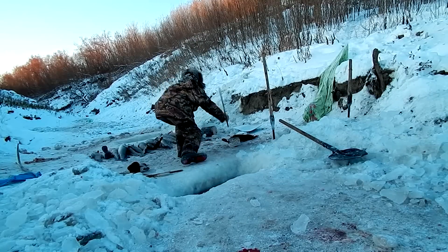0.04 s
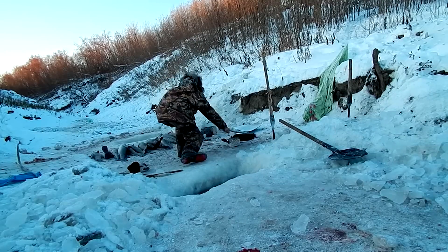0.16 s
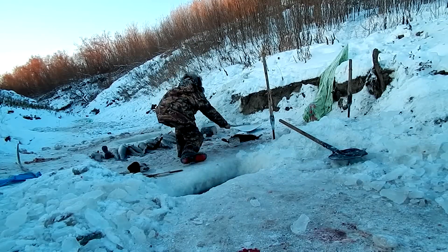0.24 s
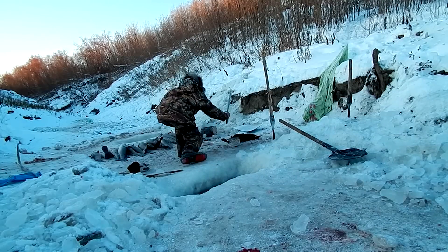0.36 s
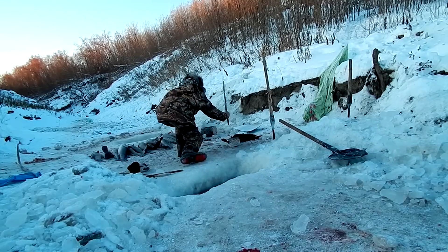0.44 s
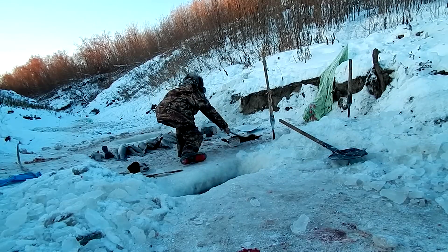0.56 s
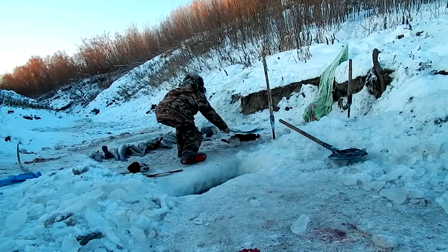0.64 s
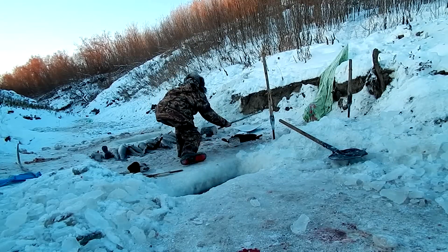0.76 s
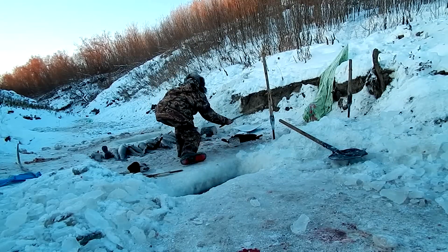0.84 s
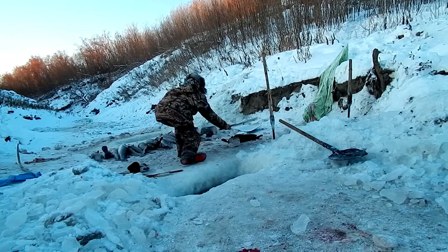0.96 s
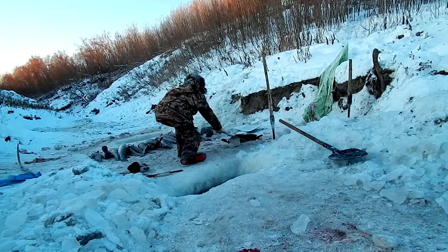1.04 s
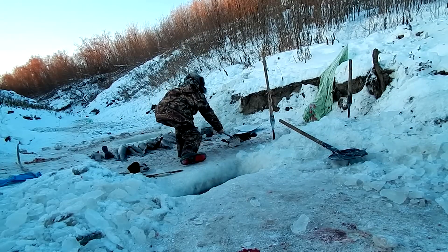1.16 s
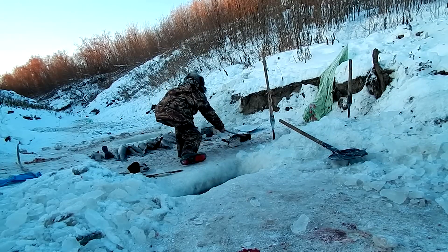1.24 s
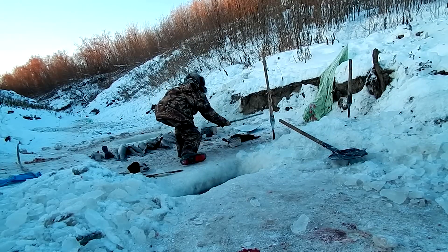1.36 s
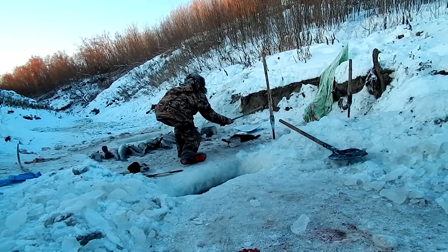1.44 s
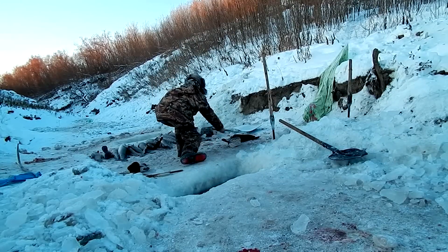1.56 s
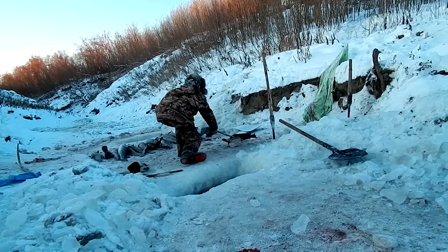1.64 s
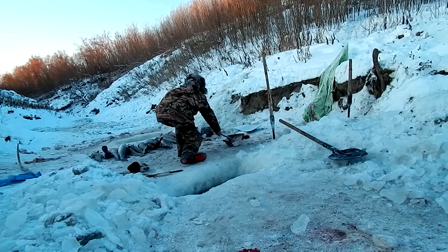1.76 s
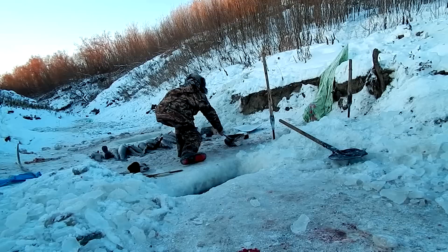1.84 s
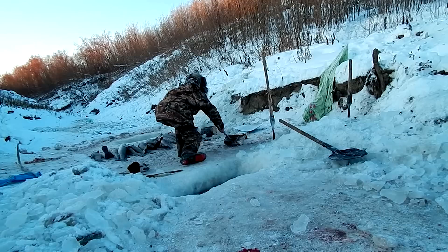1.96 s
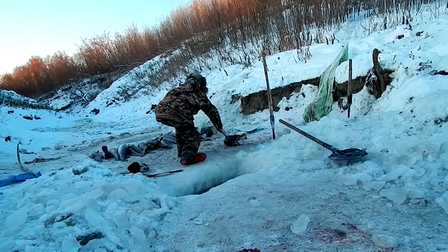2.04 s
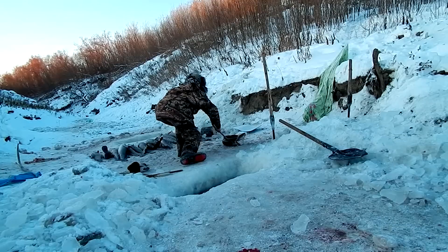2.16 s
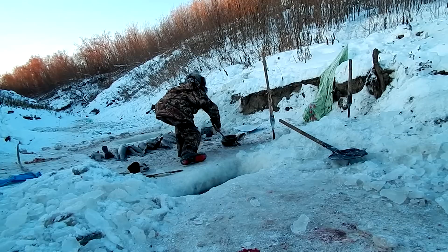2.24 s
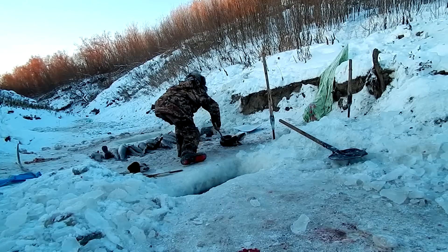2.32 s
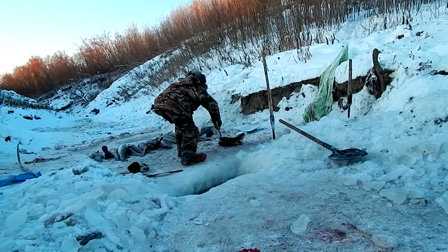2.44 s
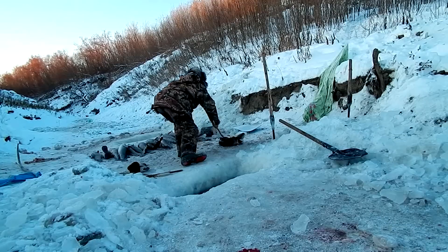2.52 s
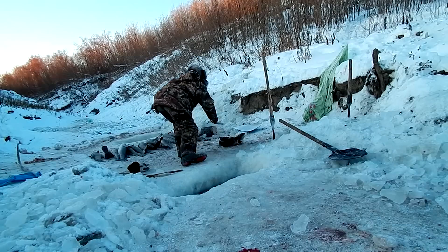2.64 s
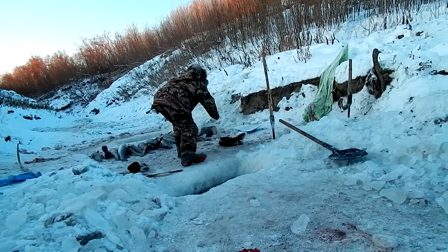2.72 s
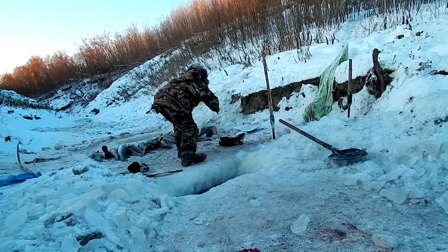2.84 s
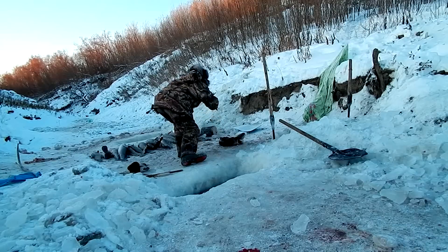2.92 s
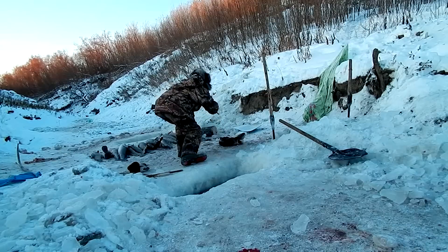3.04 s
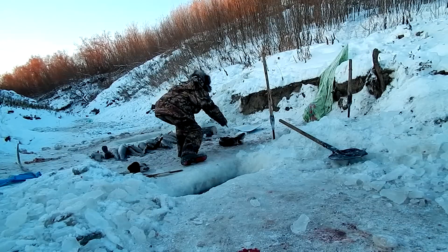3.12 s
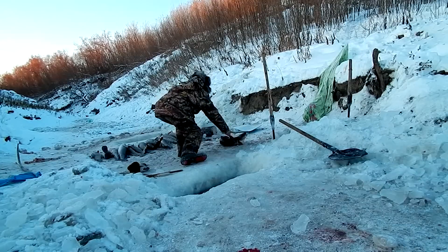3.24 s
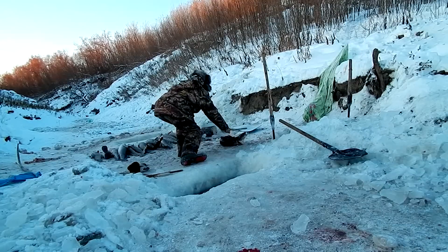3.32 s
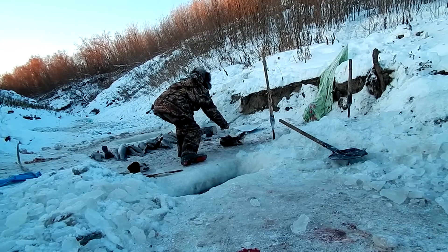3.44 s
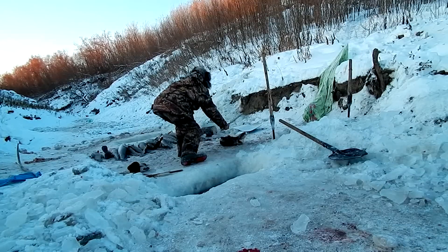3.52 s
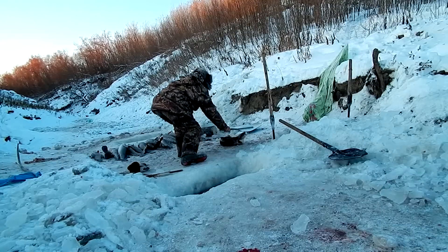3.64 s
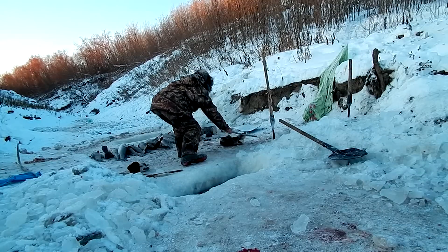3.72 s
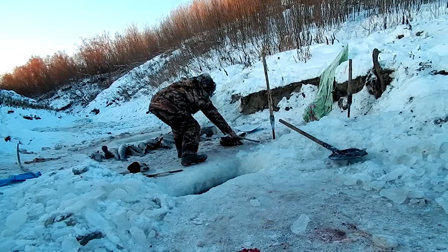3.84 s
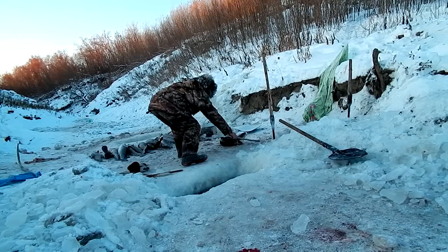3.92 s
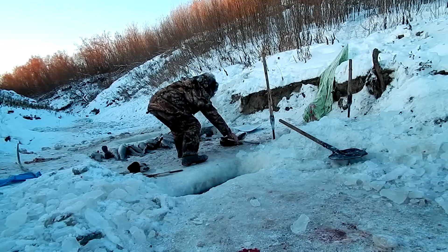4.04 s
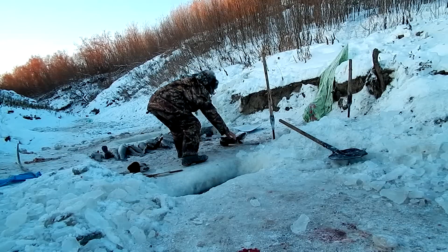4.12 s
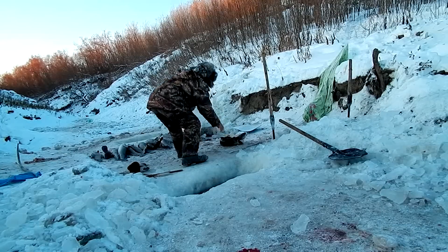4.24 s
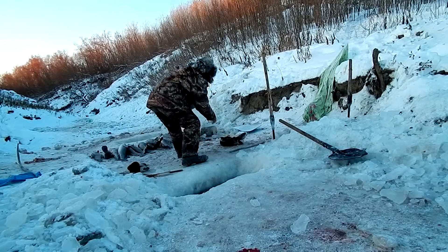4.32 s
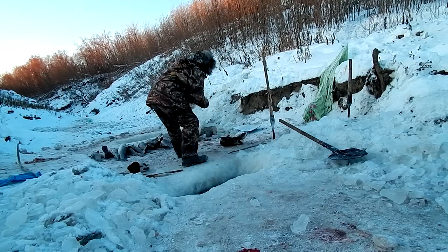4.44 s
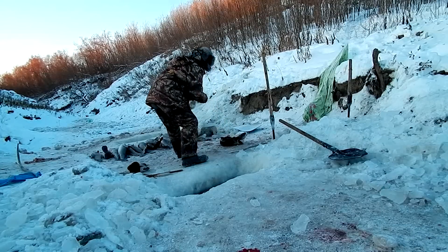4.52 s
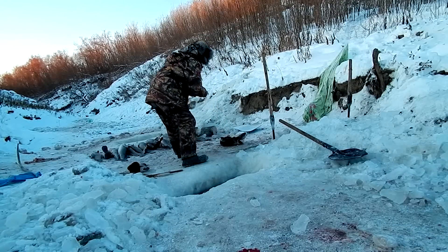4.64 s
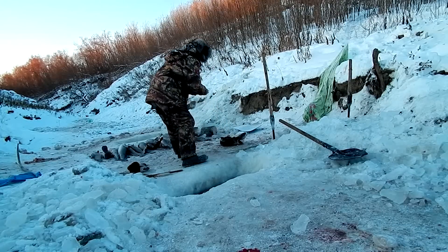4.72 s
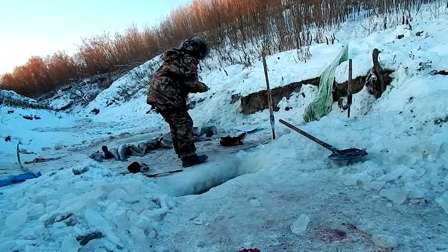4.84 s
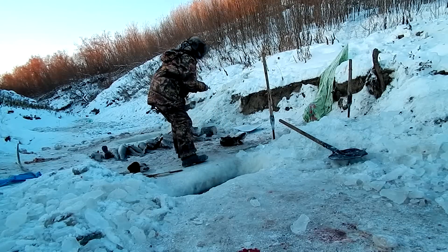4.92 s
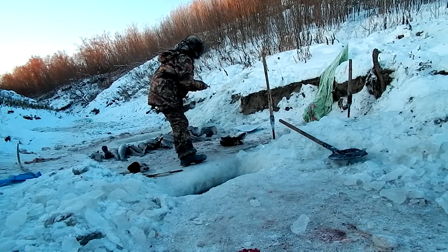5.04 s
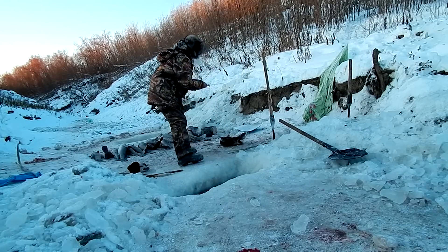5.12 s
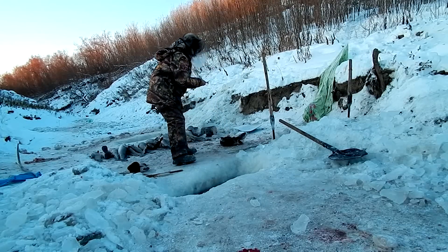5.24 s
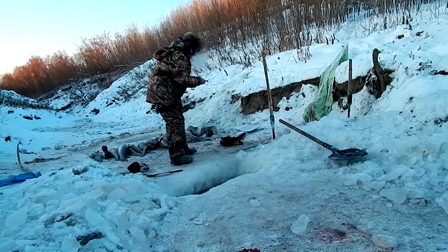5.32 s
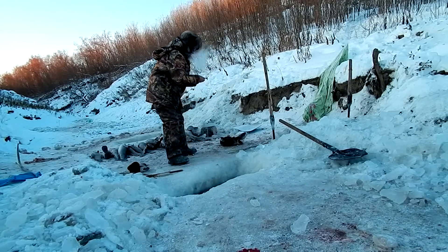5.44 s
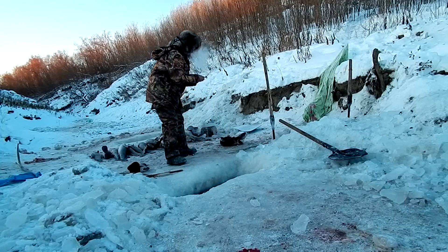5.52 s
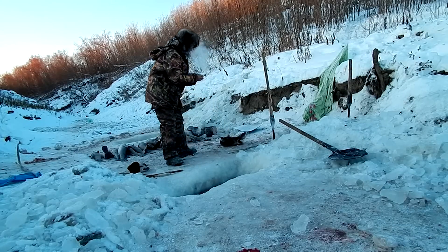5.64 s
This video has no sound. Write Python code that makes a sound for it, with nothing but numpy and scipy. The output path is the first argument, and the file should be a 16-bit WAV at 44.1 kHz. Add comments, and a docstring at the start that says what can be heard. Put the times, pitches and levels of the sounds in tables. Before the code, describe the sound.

A steel chisel chops into river ice with spaced, sharp, cracking blows, then drags and rattles over loose chips as boots and stiff cloth rustle.

```python
"""On river ice outdoors, a steel chisel is driven in five times, then dragged and rattled over the chips.
Each blow is a burst of cracking noise, a ring that sags in pitch, damped modes of the sheet and a spray of grains.
Knocks convolve noise with the modes of the bar; snaps are short filtered noise; soft thumps ring the sheet.
Boots and stiff cloth crunch, creak and rustle as noise that swells and dies over a faint hush."""
import sys
import numpy as np
from scipy import signal
from scipy.fft import rfft, irfft
from scipy.io import wavfile
from scipy.ndimage import uniform_filter1d

SR = 44100
rng = np.random.default_rng(int(sys.argv[2]) if len(sys.argv) > 2 else 0)


def file_out(sig):
    """Save sig as 16-bit WAV at sys.argv[1]."""
    # one column per channel
    cols = np.atleast_2d(sig).T
    # limit, then scale
    lim = np.clip(cols, -1, 1)
    pcm = np.round(lim * 32767).astype(np.int16)
    wavfile.write(sys.argv[1], SR, pcm)


N = 250488
T = np.arange(N) / SR
OPPOSED = np.array([[1], [-1]])  # signs of a left-right difference

# Five chisel blows, their rebounds and a few hard bumps on the ice. Each row: start in seconds, ring peak in dB,
# settled ring pitch in Hz, ring t60 in seconds, time constant of the pitch sag in seconds, thud and crack peaks
# in dB against the ring, crack centre in Hz, gain of its sizzle in dB, spray gain in dB (12 dB is taken off
# later), left minus right in dB.
BLOW_EVENTS = [(0.068, -11, 430, 0.022, 0.0013, -10.5, -1.5, 1940, -17, -21, -1.5),
               (0.540, -17, 273, 0.033, 0.0032, -0.5, -7, 1940, -13, -20, 1.5),
               (1.015, -8, 371, 0.023, 0.001, -17, 1, 4300, -13, -13.5, -2.5),
               (1.565, -9.5, 372, 0.02, 0.0014, -15.5, 0, 4500, -13, -22, -1.5),
               (1.591, -23, 600, 0.0058, 0.00052, -15, 5.5, 1860, -36, -22, -2),
               (1.639, -35.5, 410, 0.022, 0.0008, -18, -14, 3000, -5, -18, -1),
               (3.1183, -8, 586, 0.023, 0.0011, -22, -0.5, 3400, -0.5, -25.5, -2),
               (4.51, -36.5, 406, 0.026, 0.00081, -12, 2.5, 1480, -28, -41, -4),
               (4.616, -35.5, 403, 0.076, 0.00069, -18, -24, 1500, -15, -25, 1),
               (4.936, -26, 384, 0.03, 0.001, -10, 0, 1060, -34, -42, -.5)]
# Knocks and skids of the bar on the ice. Each row: start in seconds, peak in dB, gain of the modes above 2300 Hz
# in dB, gain of those below 1600 Hz in dB, left minus right in dB.
BAR_KNOCKS = [(2.7648, -42.5, -18, -11, -2), (3.764, -33.5, -18, 6, -5), (3.953, -30, -18, 0, -1.5),
              (4.1418, -19.5, -7.5, 2.5, -1.5), (4.207, -32.5, -5, -12, -2), (4.2622, -24.5, -12, -1, -1),
              (4.3306, -36.5, -17, -5, -3), (4.3934, -16, 12, -15, 2), (4.4509, -28.5, -14, -24, -2),
              (4.4937, -39, -22, 11, 1), (4.545, -37, -5, -3, -2), (4.574, -34, 5, -12, -2),
              (4.6094, -40.5, -5, -12, -7), (4.6418, -37, -3, -4, -3), (4.7023, -44, -7, -15, 0),
              (4.7227, -38, -6, -13, -4)]
# Modes of the free bar. Each row: nominal frequency in Hz, nominal level in dB, undamped t60 in seconds.
BAR_MODES = [(634, -20, 0.25), (1064, -14.5, 0.054), (1416, -4.5, 0.039), (1990, -2, 0.063),
             (2193, -4.5, 0.016), (2657, 5.5, 0.033), (2840, -3.5, 0.054), (3380, -9.5, 0.058),
             (4000, -12, 0.026), (4990, -10.5, 0.037)]
# Snaps of chips and crust. Each row: start in seconds, peak in dB, centre in Hz, left minus right in dB.
ICE_SNAPS = [(0.0684, -24, 7000, -9), (0.08, -34.5, 1980, 6), (0.1844, -39.5, 2470, -4),
             (0.2375, -41, 1440, 2), (0.382, -39, 1240, -3), (1.031, -27, 4010, 10), (1.0405, -27, 2020, 5),
             (1.0494, -41, 3310, -1), (1.2088, -44, 2660, -1.5), (1.3049, -39, 8870, -10),
             (1.3204, -31, 9950, -1.5), (1.3331, -19.5, 9860, -1), (1.6, -23, 6500, 3),
             (1.638, -40, 3000, 0), (1.904, -43, 2150, 0), (2.951, -32.5, 2740, -4), (2.967, -36, 9000, 4),
             (3.1194, -19.5, 8870, 2), (3.1313, -15.5, 5970, 4), (3.324, -56, 1880, 13),
             (3.485, -48, 3470, 2), (3.5292, -42, 1850, 2), (3.654, -40, 1530, -4), (3.68, -36.5, 1790, -2),
             (3.7615, -18.5, 10900, 0), (3.8497, -22.5, 11200, 1), (3.912, -45, 2870, -3),
             (4.0695, -36.5, 4130, -0.5), (4.117, -37, 1980, -2), (4.1903, -18, 3400, -1),
             (4.2254, -33, 3670, 0.5), (4.3946, -10.5, 2250, -3), (4.51, -37, 1490, -1),
             (4.769, -26, 2340, 1), (4.8624, -41, 10900, 5), (4.8953, -35.5, 2920, -7),
             (4.935, -37.5, 1200, -5), (4.996, -25, 3460, -3), (5.017, -26.5, 8800, 2),
             (5.041, -26, 3240, -2), (5.086, -21, 9300, 1.5), (5.122, -32, 10900, 2),
             (5.1414, -24, 10500, 4), (5.1554, -23, 5820, -1), (5.171, -24, 5670, -7),
             (5.1797, -20, 10700, 5), (5.282, -28, 9980, 4), (5.29, -25, 8300, 7), (5.3038, -24.5, 9900, 1),
             (5.3634, -37.5, 3440, -4), (5.4, -38, 1870, -1), (5.4198, -32, 9400, 8),
             (5.4824, -33, 3320, -2), (5.4996, -31, 2200, -3.5), (5.5578, -34.5, 1770, 0),
             (5.574, -26.5, 9100, 2)]
# Low modes of the ice sheet. Each row: nominal frequency in Hz, level in dB, undamped t60 in seconds.
SHEET_MODES = [(89, -16, 0.17), (127.1, 1, 0.092), (160, 0.5, 0.068)]
# Weight shifts and soft bumps that ring the sheet. Each row: start in seconds, peak in dB.
SOFT_THUMPS = [(0.123, -37), (0.252, -53), (0.63, -47), (0.877, -49), (0.993, -34.5), (1.197, -53),
               (1.307, -52), (1.62, -40), (1.781, -52), (1.907, -42), (1.94, -45), (2.003, -43),
               (2.031, -44), (2.254, -50), (2.353, -47), (2.379, -51), (2.592, -49), (2.953, -59.5),
               (3.726, -56), (3.817, -52), (3.999, -45.5), (4.07, -55), (4.466, -51), (4.716, -48),
               (4.863, -55), (4.993, -35), (5.043, -41.5), (5.096, -36.5), (5.153, -44), (5.272, -43),
               (5.474, -52), (5.555, -47)]
# Snow creaks underfoot. Each row: time of the peak in seconds, rise and fall time constants in seconds,
# level in dB ahead of the mixing gains, mean pitch in Hz, roughness from 0 to 1.
SNOW_CREAKS = [(2.009, 0.013, 0.037, -44, 743, 0.7), (2.075, 0.037, 0.02, -44.5, 707, 0.97),
               (3.592, 0.024, 0.013, -46.5, 753, 0.42)]
# Hollows that the rough slips ring. Each row: centre in Hz, width as a share of the centre, level in dB.
CREAK_HOLLOWS = [(737, 0.21, 0.5), (1350, 0.13, -14), (2195, 0.073, -12.5)]
# Spectrum of the outdoor hush. Each row: frequency in Hz, relative spectrum level in dB.
HUSH_SPECTRUM = [(120, -38.5), (200, -25), (362, -3), (443, 2.5), (486, -1), (690, -8), (790, -7.5),
                 (2060, -15), (2230, -18.5), (5000, -37.5), (6500, -73.5), (11000, -120)]
# Spectrum of the cloth rustle. Each row: frequency in Hz, relative spectrum level in dB.
RUSTLE_SPECTRUM = [(1470, -22), (2500, -26.5), (3420, -2), (4400, -4.5), (5660, -3.5), (10500, 3),
                   (13300, 0), (15600, -3), (16300, -16)]
# Floor levels without movement or lulls. The row: hush, rustle, grit and footing rumble, all in dB.
STILL_LEVELS = (-55.5, -60, -62, -69.5)
# What a full blow leaves rolling. The row: hush, rustle, grit and rumble, all in dB against the blow's ring peak.
BLOW_WAKE = (-37, -31, -40, -26.5)
# Shuffles of boots, cloth and bar. Each row: time of the peak in seconds, rise and fall time constants
# in seconds, then hush, rustle, grit and footing rumble in dB.
SHUFFLES = [(0.0, .02, 0.051, -49.5, -61.5, -53.5, -50), (0.2, .03, 0.021, -58, -59, -66.5, -75),
            (1.2, .03, .04, -56.5, -57.5, -72, -55), (1.32, .05, 0.055, -55, -49.5, -57.5, -70),
            (2.04, .08, 0.042, -48, -56, -65.5, -45), (2.36, 0.021, 0.072, -53, -59, -60, -55),
            (2.97, 0.067, .08, -54.5, -56.5, -57, -70), (3.76, 0.033, 0.035, -56, -58.5, -57, -56),
            (3.9, 0.11, 0.18, -67, -54.5, -62.5, -62), (4.16, 0.08, 0.13, -51.5, -54, -49.5, -54),
            (4.32, 0.11, 0.087, -70, -52, -60.5, -63), (4.44, 0.15, 0.039, -54, -52, -51.5, -66),
            (4.6, 0.09, 0.14, -53.5, -48, -52.5, -60), (4.73, 0.079, 0.073, -53, -46, -46, -65),
            (5.0, .06, 0.11, -51, -49.5, -53, -49), (5.14, 0.13, 0.089, -47, -41.5, -52.5, -50),
            (5.209, 0.035, .04, -66, -42, -62, -64), (5.29, .04, 0.075, -58, -47, -56.5, -56),
            (5.4, .03, 0.027, -73, -53, -57, -76), (5.49, 0.017, 0.022, -55, -51, -53, -55),
            (5.57, 0.048, 0.02, -51.5, -51, -56.5, -54)]
# Sudden drops of the still floor that creep back. Each row: start in seconds, depth in dB before the shares
# below, recovery time constant in seconds.
FLOOR_LULLS = [(0.28, -1.5, .15), (1.1, -1.5, .1), (1.649, -5, .2), (3.218, -12, 0.35), (5.61, -3, 0.45)]
# How deeply each layer follows a lull. The row: factors on the depth for hush, rustle, grit and rumble [no unit].
LULL_FACTORS = (0.84, 1.58, 1.15, 1)

SKID_S, GRIP_DAMP = 0.0028, 0.5  # time constant of a skid; the glove shortens the ring of the bar
CRUSH_DB, CRUSH_HZ, CRUSH_T60_S = -5, 2030, 0.01  # ice crushed under each knock
CRUMBLE_T60_S = 0.021
THUMP_DAMP = 0.9  # a boot on the ice shortens its ring
FULL_BLOW_DB = -16.9  # only blows above this peak leave a wake
WAKE_RISE_S, WAKE_FALL_S = 0.003, 0.024
LULL_ONSET_S = 0.014
TOP_HZ = 16100


def blows():
    """Dispersion of bending waves: the high pitches arrive first, beside a crack, a late thud and flying chips."""
    out, t = np.zeros((2, N)), T[:SR // 4]
    for s, db, hz, t60, sag, thud_db, crack_db, crack_hz, sizzle_db, spray_db, pan_db in BLOW_EVENTS:
        noise = rng.standard_normal((4, len(t)))
        # the pitch starts 900 Hz high, and the ring swells while it sags
        phase = 2 * np.pi * (hz * t + 900 * sag * (1 - np.exp(-t / sag)))
        ring = -np.sin(phase) * fade(t, t60) * (1 - np.exp(-t / (1.2 * sag)))
        ring += undb(-20.5) * unit(band(noise[0], 410, .8)) * fade(t, 0.1)
        add(out, s, ring, db, pan_db)
        add(out, s + 0.0042, sheet(t, 0.068 * noise[3], 1), db + thud_db, 0)

        burst = (t / sag + 1.2) * np.exp(-t / (0.6 * sag))
        crack = []
        for n in noise[1:3]:
            edge = band(band(n, crack_hz, 0.47), crack_hz, 0.43)
            sizzle = band(band(n, 9100, 0.87), 14000, 0.35)
            crack.append((edge + undb(sizzle_db) * sizzle) * burst)
        add(out, s, crack[0], db + crack_db, pan_db, .5 * crack[1])

        spray = chip_spray(t, db + spray_db - 12.0)
        spray_peak_db = 20 * np.log10(np.abs(spray[0]).max())
        add(out, s, spray[0], spray_peak_db, pan_db, .5 * spray[1])
    return out


def chip_spray(t, db):
    """Granular noise: millisecond grains of very uneven size die away; returns a shared and an opposed part."""
    grain_db = 4.85 * rng.exponential(size=len(t) // 64 + 1)
    size = uniform_filter1d(undb(grain_db.repeat(64)[:len(t)]), 24)
    decay = fade(t, 0.1) + 0.22 * fade(t, 0.16)
    parts = []
    for g in rng.standard_normal((2, len(t))):
        chips = band(band(g, 2900, 2.0), 2200, 2.3) + 0.7 * band(g, 9500, 0.5)
        parts.append(unit(chips) * size * decay * undb(db))
    return parts


def sheet(t, detune, damp):
    """Modal response of a plate: a soft push sets off a few low damped modes of the ice."""
    modes = sum(undb(db) * np.sin(2 * np.pi * hz * (1 + a) * t) * fade(t, damp * t60)
                for (hz, db, t60), a in zip(SHEET_MODES, detune))
    return (1 - np.exp(-t / 0.0019)) * modes


def knocks():
    """Source and resonator: a short rough skid is convolved with the damped modes of the bar."""
    out, t = np.zeros((2, N)), T[:SR // 10]
    for s, db, bright_db, deep_db, pan_db in BAR_KNOCKS:
        push = rng.standard_normal((2, len(t))) * t * np.exp(-t / SKID_S)
        scatter = rng.standard_normal((len(BAR_MODES), 2))  # per mode: level in dB, detuning
        body = np.zeros(len(t))
        for (hz, mode_db, t60), (a, b) in zip(BAR_MODES, scatter):
            share_db = bright_db if hz > 2300 else deep_db if hz < 1600 else 0
            tone = np.sin(2 * np.pi * hz * (1 + 0.026 * b) * t)
            body += undb(mode_db + share_db + a) * tone * fade(t, GRIP_DAMP * t60)
        crush = unit(band(rng.standard_normal(len(t)), CRUSH_HZ, 0.54))
        body += undb(CRUSH_DB) * crush * fade(t, CRUSH_T60_S)
        body[:4] += 1.3 * undb(bright_db / 2) * np.array([1, 1, -1, -1])  # the bare scratch of contact
        mid, side = (signal.fftconvolve(p, body)[:len(t)] for p in push)
        add(out, s, mid, db, pan_db, 0.21 * side)
    return out


def snaps():
    """Brittle fracture: one needle click, then a few milliseconds of crumbling, as band-limited noise."""
    out, t = np.zeros((2, N)), T[:SR // 15]
    for s, db, hz, pan_db in ICE_SNAPS:
        shape = fade(t, 0.00063) + 0.13 * fade(t, CRUMBLE_T60_S)
        mid, side = (band(band(n * shape, hz, 1.15), hz, 1.15) for n in rng.standard_normal((2, len(t))))
        add(out, s, mid, db, pan_db, 0.497 * side)
    return out


def thumps():
    """Soft excitation of a plate: boots and knees press the sheet and damp its modes."""
    out, t = np.zeros((2, N)), T[:SR // 5]
    for (s, db), detune in zip(SOFT_THUMPS, rng.standard_normal((len(SOFT_THUMPS), 3))):
        add(out, s, sheet(t, .08 * detune, THUMP_DAMP), db, 0)
    return out


def creaks():
    """Stick-slip of packed snow under a boot: a wavering note, and rough slips that ring three hollows."""
    out = 0
    for s, rise, fall, db, hz, rough in SNOW_CREAKS:
        pitch = hz * (1 + 0.021 * walk(100))
        note = np.sin(2 * np.pi * np.cumsum(pitch) / SR)
        slips = crackle(200, 3.0)()
        rings = unit(sum(undb(g) * band(band(slips, f, w), f, w) for f, w, g in CREAK_HOLLOWS))
        mix = 2.0 * (1 - rough) * note + 1.33 * rough * rings
        out = out + mix * undb(db) * swell(s, rise, fall)
    return out


def scrape(x):
    """Friction noise coupled to a resonator: broad grit, with the bar humming along."""
    hum = sum(undb(db) * band(x, hz, 0.017) for hz, db, _ in BAR_MODES)
    return band(band(x, 2600, 1.6), 2600, 1.6) + 0.5 * hum


def bed():
    """Sum of shaped noises: outdoor hush, cloth rustle, grit under bar and boots, and rumble through the snow."""
    hush_db, rustle_db, grit_db, rumble_db = activity()
    # near, hard rubbing is loud and grainy; faint rubbing blurs into a smooth hiss
    cloth = crackle(700, 3.0 * np.clip((rustle_db + 66) / 16, .2, 1))
    chips = crackle(500, 3.5 * np.clip((grit_db + 66.5) / 14, .2, 1))
    lumps = crackle(27, 0.82)
    hush = wide(lambda: colour(rng.standard_normal(N), HUSH_SPECTRUM), 0.57) * undb(hush_db)
    rustle_flicker_db, grit_flicker_db = 2.5 * walk(50), 2.5 * walk(70)
    rustle = wide(lambda: colour(cloth(), RUSTLE_SPECTRUM), 0.9) * undb(rustle_db + rustle_flicker_db)
    grit = wide(lambda: unit(scrape(chips())), 0.67) * undb(grit_db + grit_flicker_db)
    rumble = wide(lambda: unit(band(band(lumps(), 110, 1.0), 110, 1.3)), 0.22) * undb(rumble_db)
    return hush + rustle + grit + rumble


def activity():
    """Addition of powers: levels in dB of the four layers from a still floor with lulls, wakes and shuffles."""
    lull_db = 0
    for s, depth_db, recovery in FLOOR_LULLS:
        onset = np.clip((T - s) / LULL_ONSET_S, 0, 1)
        lull_db = lull_db + depth_db * onset * np.exp(-((T - s) / recovery) ** 2)
    power = undb(np.array(STILL_LEVELS)[:, None] + np.outer(LULL_FACTORS, lull_db)) ** 2
    wakes = [(s, WAKE_RISE_S, WAKE_FALL_S, *(db + np.array(BLOW_WAKE)))
             for s, db, *_ in BLOW_EVENTS if db > FULL_BLOW_DB]
    for s, rise, fall, *db in [*SHUFFLES, *wakes]:
        power = power + (undb(db)[:, None] * swell(s, rise, fall)) ** 2
    return 10 * np.log10(power)


def swell(s, rise, fall):
    """Exponential growth to 1 at s, then exponential decay."""
    return np.exp(-np.abs(T - s) / np.where(T < s, rise, fall))


def crackle(rate, spread_db):
    """Amplitude-modulated noise: its level jumps grain by grain; the spread may change in time."""
    k = int(SR / rate)
    grain = rng.exponential(size=N // k + 1).repeat(k)[:N]
    size = undb(spread_db * grain)
    return lambda: rng.standard_normal(N) * size


def walk(rate):
    """Slow random modulation: levels drawn every 1 / rate s, joined by a moving average."""
    k = int(SR / rate)
    return uniform_filter1d(np.repeat(rng.standard_normal(N // k + 1), k), k)[:N]


def colour(x, points):
    """Spectral shaping: filters noise to (Hz, dB) points joined over log frequency, at unit RMS."""
    hz, db = np.transpose(points)
    bins = np.log(np.fft.rfftfreq(N, 1 / SR) + 1)
    return unit(irfft(rfft(x) * undb(np.interp(bins, np.log(hz), db)), N))


def wide(make, side):
    """Partial coherence: left and right share one noise and oppose another."""
    return (make() + side * make() * OPPOSED) / np.sqrt(1 + side ** 2)


def add(out, s, x, db, pan_db, side=0):
    """Superposition: places a sound scaled to its peak in dB, then tilts it left or right."""
    i = int(s * SR)
    x = x + side * OPPOSED
    x = x * undb(db) / np.abs(x).max()
    out[:, i:i + x.shape[1]] += (x * undb([[pan_db / 2], [-pan_db / 2]]))[:, :N - i]


def band(x, hz, width):
    """Two-pole resonance; the width is a share of the centre."""
    return signal.lfilter(*signal.iirpeak(min(hz, .4 * SR), 1 / width, SR), x)


def fade(t, t60):
    """Exponential decay by 60 dB in t60 seconds."""
    return np.exp(-np.log(1000) * t / t60)


def undb(db):
    """Amplitude ratio of a level in decibels."""
    return 10 ** (np.asarray(db) / 20)


def unit(x):
    """Normalisation to an RMS of 1."""
    return x / np.sqrt(np.mean(x ** 2))


def scene():
    """Superposition of the chisel, the ice, the boots and the background."""
    return blows() + knocks() + snaps() + thumps() + bed() + creaks()


def record(dry):
    """Band limits: the small microphone loses deep bass and sags in the treble; the recorder cuts the top."""
    thin = signal.sosfilt(signal.butter(1, 60, "high", fs=SR, output="sos"), dry)
    soft = signal.sosfilt(signal.butter(2, 13000, fs=SR, output="sos"), thin)
    return signal.sosfilt(signal.ellip(10, .2, 80, TOP_HZ, fs=SR, output="sos"), soft)


dry = scene()
out = record(dry)
file_out(out)
```